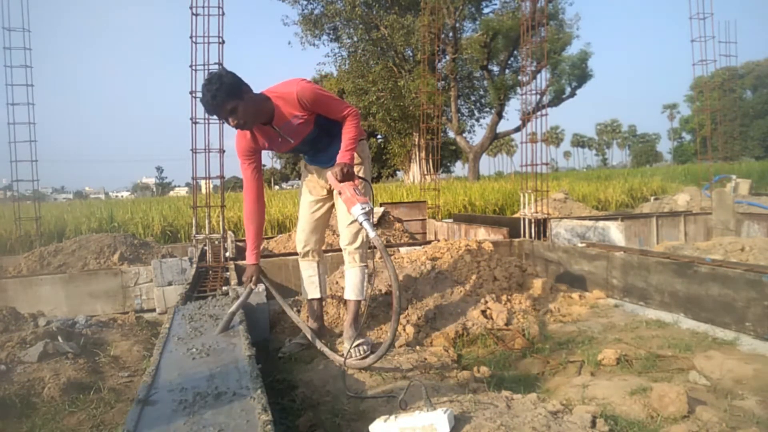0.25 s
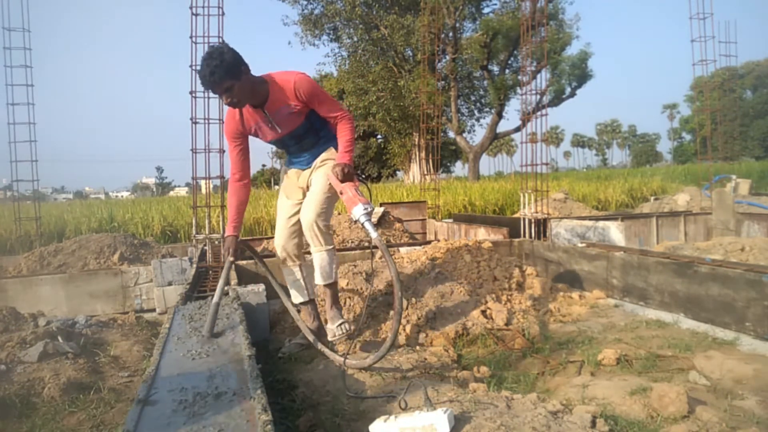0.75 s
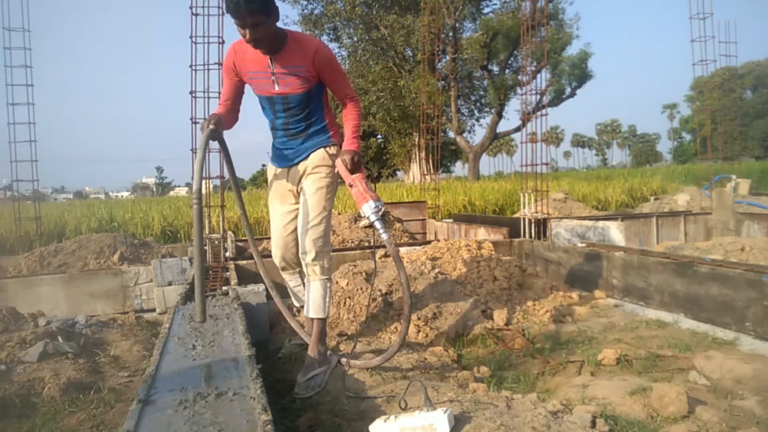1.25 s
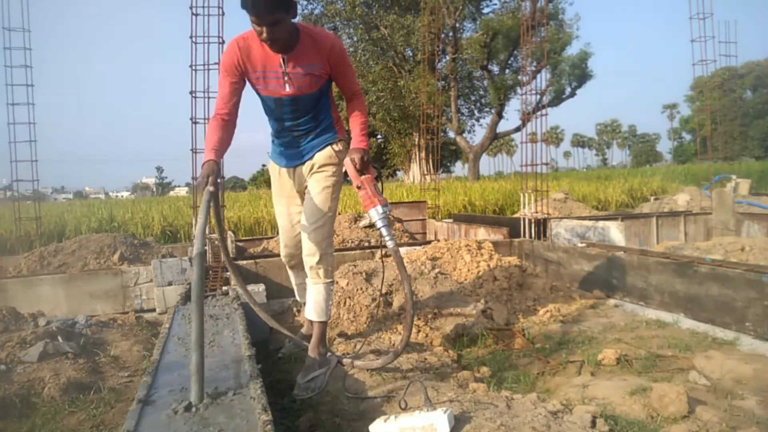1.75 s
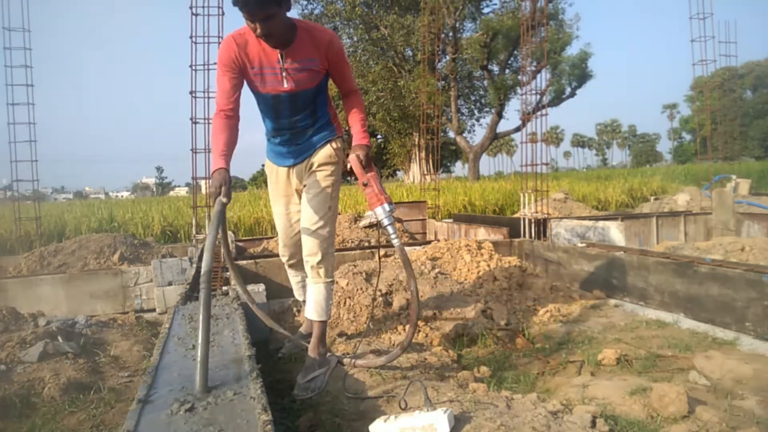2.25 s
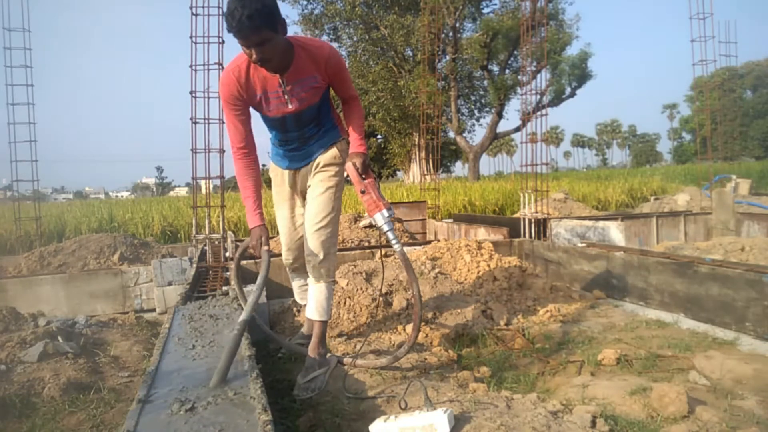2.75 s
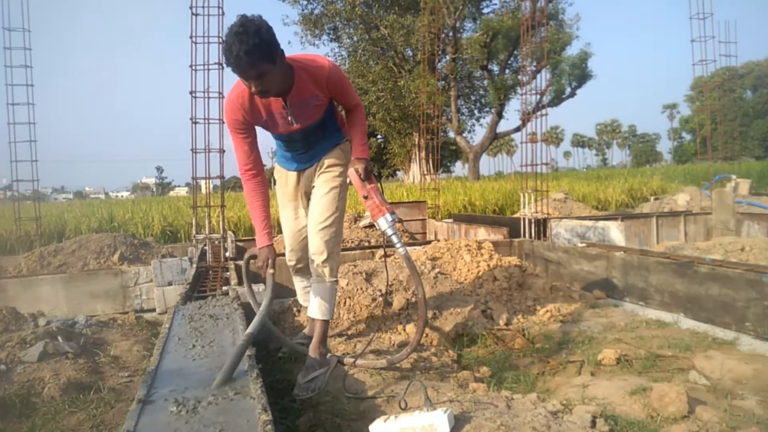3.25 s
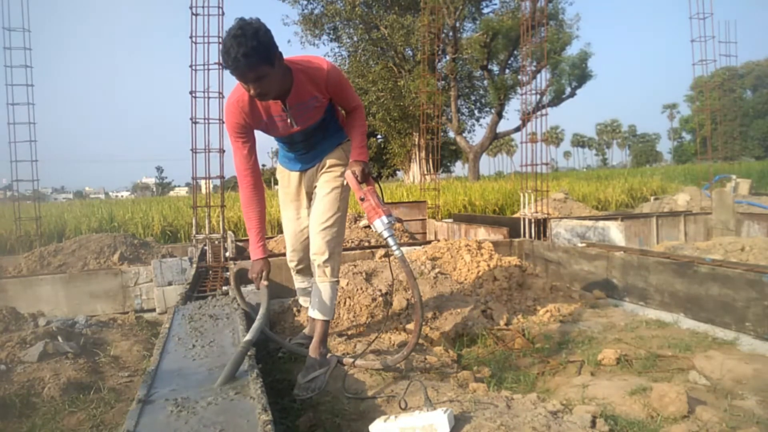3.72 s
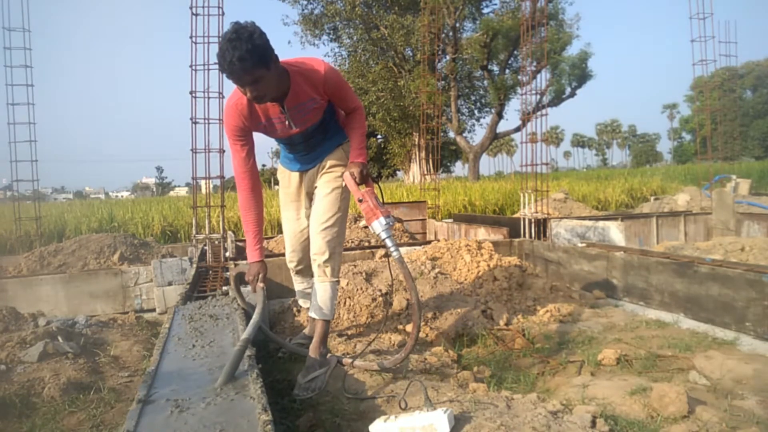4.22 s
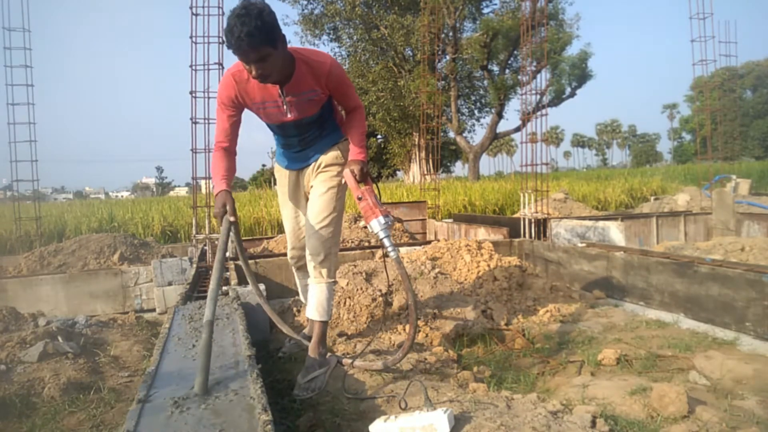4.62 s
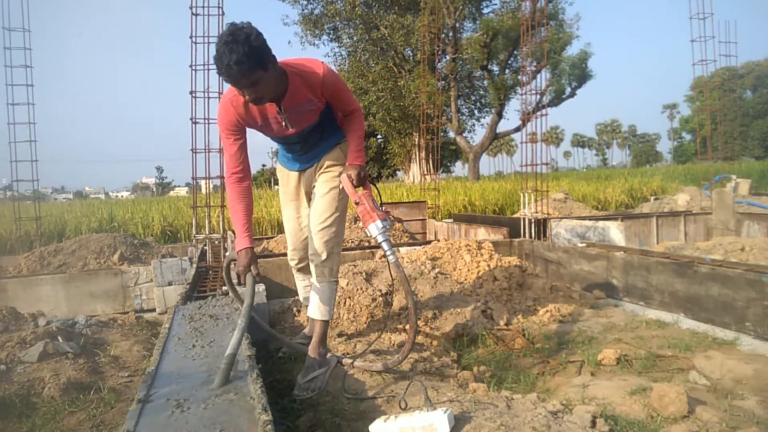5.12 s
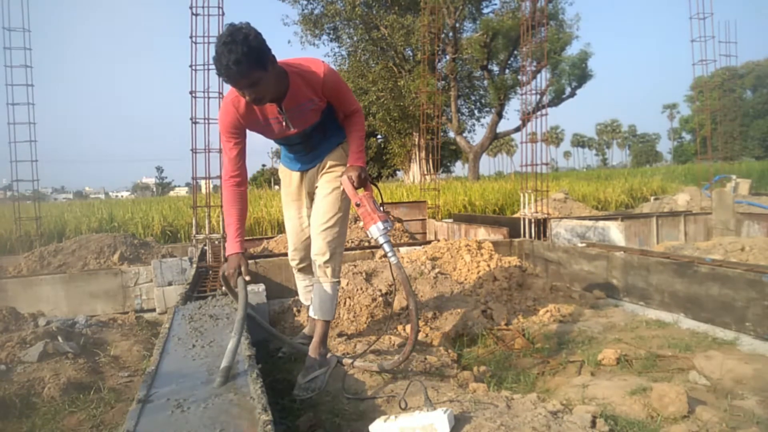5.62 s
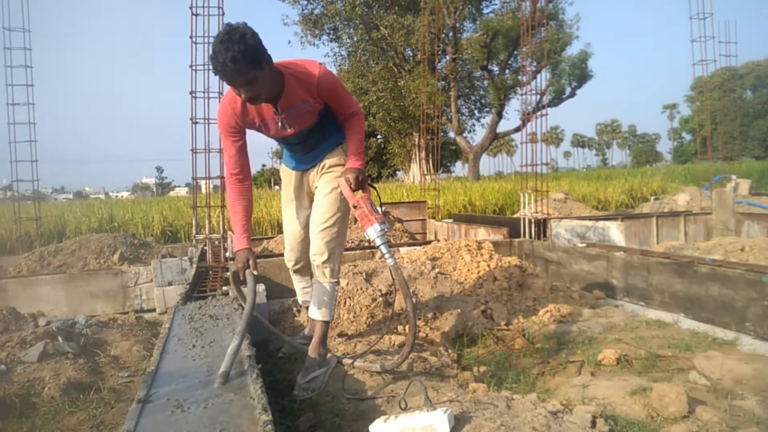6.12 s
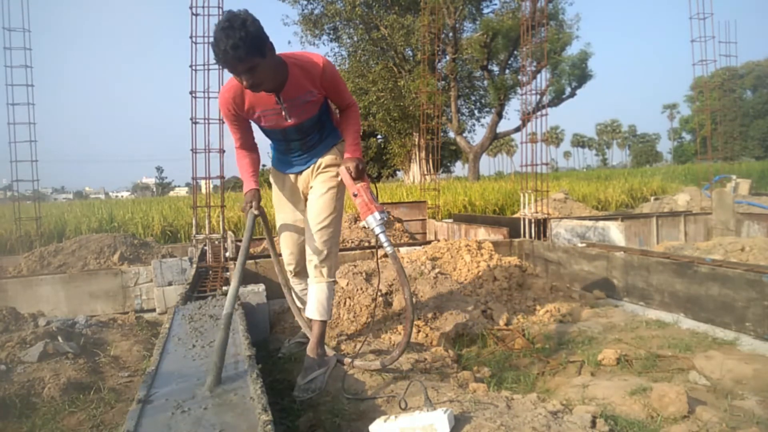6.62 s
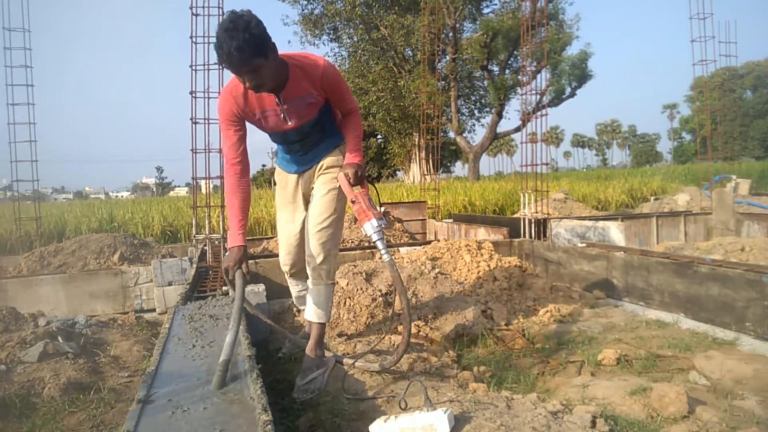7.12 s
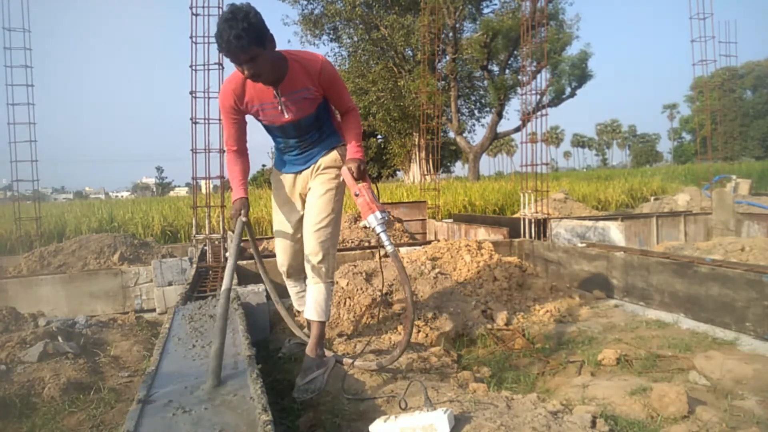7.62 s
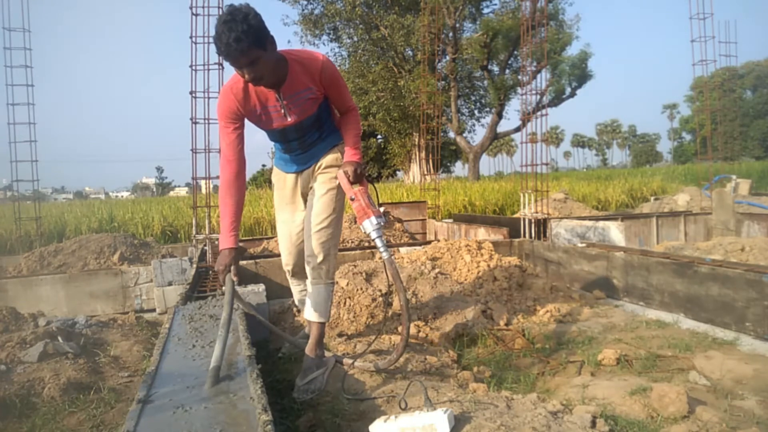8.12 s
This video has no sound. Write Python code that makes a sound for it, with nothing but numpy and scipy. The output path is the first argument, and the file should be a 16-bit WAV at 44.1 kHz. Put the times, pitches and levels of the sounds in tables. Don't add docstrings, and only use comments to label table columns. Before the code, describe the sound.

A handheld electric motor whines continuously, high and piercing, over fan hiss on an open building site. Bumps and rattling boards open; around 1.3 seconds the poker lifts, the pitch rises and stones tick off it. From 2.6 seconds it sinks back with heavy wooden thuds, then gritty churning and small wet pops. A phone a few metres away gives thin, flickering treble.

```python
import sys
import numpy as np
from scipy import signal
from scipy.fft import rfft, irfft, next_fast_len
from scipy.io import wavfile
from scipy.ndimage import uniform_filter1d

SR = 44100
rng = np.random.default_rng(int(sys.argv[2]) if len(sys.argv) > 2 else 0)


def volts_from_decibels(level):
    exponent = np.asarray(level, float) / 20
    return 10 ** exponent


def generate_wav(sig):
    pcm = np.round(np.clip(np.atleast_2d(sig).T, -1, 1) * 32767).astype(np.int16)
    wavfile.write(sys.argv[1], SR, pcm)


N = 369116
T = np.arange(N) / SR
FAST = next_fast_len(N)
HZ = np.arange(FAST // 2 + 1) * SR / FAST
WIN = dict(fs=SR, nperseg=512, noverlap=384)
LEFT_RIGHT = np.array([[1], [-1]])


def columns(table):
    s, *cols = np.transpose(table)
    return [np.interp(T, s, c) for c in cols]


def on_log(hz, table):
    points = np.array(table)
    return np.interp(np.log(hz + 1), np.log(points[:, 0]), points[:, 1])


def unit(x):
    return x / np.sqrt(np.mean(x ** 2))


def walk(rate, count=1):
    k = int(SR / rate)
    held = np.repeat(rng.standard_normal((count, N // k + 1)), k, axis=1)[:, :N]
    return unit(uniform_filter1d(held, k, axis=1))


def shape(x, table, lo_hz, hi_hz):
    spec = rfft(x, FAST) * volts_from_decibels(on_log(HZ, table))
    inside = spec[..., (HZ > lo_hz) & (HZ < hi_hz)]
    return irfft(spec, FAST)[..., :N] / np.sqrt(2 * np.sum(abs(inside) ** 2) / x.size / FAST)


def ring(x, modes):
    out = 0
    for hz, width_hz, db in modes:
        out = out + volts_from_decibels(db) * signal.lfilter(*signal.iirpeak(hz, hz / width_hz, SR), x)
    return out


def swells(events, rest_db, count=1):
    attack_s, release_s, swell = 0.025, 0.032, 0.34
    power = volts_from_decibels(rest_db) ** 2
    for start, length, *db in events:
        rise = (T - start) / (attack_s + swell * length) + .5
        fall = (start + length - T) / (release_s + swell * length) + 0.73
        gate = np.clip(np.minimum(rise, fall), 0, 1)
        power = power + (gate * volts_from_decibels(sum(db[:count]))) ** 2
    return 10 * np.log10(power)


def window(s, start, length, fade_s):
    return np.clip(np.minimum(s - start, start + length - s) / fade_s + .5, 0, 1)


def bumps(events, t60_s, rise_s=0.0032):
    out, t = np.zeros(N + 9000), np.arange(9000) / SR
    for start, db, hz in events:
        modes = sum(np.sin(2 * np.pi * (hz * ratio * t)) for ratio in (.8, 1, 1.27))
        envelope = (1 - np.exp(-t / rise_s)) * 1000 ** (-t / t60_s)
        out[int(start * SR):][:9000] += volts_from_decibels(db - 4.5) * modes * envelope
    return out[:N]


# frequency_hz, left_minus_right_db
PORT_BALANCE = [(60, 0), (200, -0.5), (700, .5), (2400, -0.5), (4400, -1), (6500, -2.5), (8100, -8.5),
                (10500, -16), (12500, -1.5), (15000, -5)]
# frequency_hz, shared_power_0_to_1
PORT_LIKENESS = [(40, .9), (70, .96), (130, .94), (290, .66), (640, .84), (1400, .62), (3100, .58),
                 (6800, .25), (15000, .5)]


def ports(direct, lag_s):
    share = np.clip(on_log(HZ, PORT_LIKENESS), 0, 1)
    first, left, right = rfft(direct, FAST)
    shared = np.sqrt(share) * first * np.exp(1j * np.pi * HZ * lag_s * LEFT_RIGHT)
    both = shared + np.sqrt(1 - share) * np.array([left, right])
    return irfft(both * volts_from_decibels(LEFT_RIGHT * on_log(HZ, PORT_BALANCE) / 2), FAST)[:, :N]


# time_s, gear_mesh_hz
SPEED = [(0, 2758), (.65, 2852), (1.24, 2940), (1.55, 3093), (1.8, 3094), (2.17, 3099), (2.63, 2972),
         (2.98, 2921), (3.24, 2758), (3.54, 2815), (4.59, 2876), (4.75, 2797), (5.11, 2814), (6.05, 2974),
         (6.65, 2898), (7.08, 2900), (7.41, 2990), (8.37, 2998)]


def motor_speed():
    return columns(SPEED)[0]


# start_s, length_s, gain_db
LIFTS = [
    (1.3, 0.89, 11.5),
]


def free_running():
    return swells(LIFTS, 0)


# multiple_of_mesh, wander_hz, left_db, right_db
WHINE = [(1, 95, -4.5, -2.5), (1.34, 79.8, -11.5, -7.5), (1.6, 30.1, -15.5, -13), (2, 21.1, -2.5, -1),
         (2.2, 40, -17, -11.5), (2.36, 40, -21, -12), (2.6, 35, -12, -10.5), (3, 23.2, -6, 1),
         (3.056, 26.8, -25, -6), (3.331, 30.2, -14, -8), (3.598, 31.8, -5, -2), (3.929, 41, -13, 2),
         (4, 33.2, -9, 9), (4.6, 70, -16, -9), (5, 35, -17, -6)]
# time_s, third_tone_db, second_tone_left_minus_right_db
FACING = [
    (0, 0, 5),
    (1.2, 0, -7),
    (2.4, -2, -0.5),
    (3.3, -10, -1),
    (5.3, 2.5, -3),
    (6.3, -1, -4.5),
    (7.3, 1, 2),
    (8.37, 0, 13),
]


def whine(mesh_hz, body_db, low_db, high_db, free_db):
    third_db, turn_db = columns(FACING)
    hunt = .0006
    turns = np.cumsum(mesh_hz * (1 + hunt * walk(18)[0])) / SR
    skew = LEFT_RIGHT * (-.015 + .02 * walk(1.5))
    out = 0
    for multiple, wander_hz, left_db, right_db in WHINE:
        casing = multiple < 1.5
        wobble = np.cumsum(walk(260 if casing else 80)[0]) * wander_hz / SR
        tone = np.sin(2 * np.pi * (multiple * turns + wobble + rng.random() + multiple * skew))
        level_db = np.array([[left_db], [right_db]]) + 1.2 * walk(12, count=2) + 1.8 * walk(70)
        if casing:
            level_db = level_db + body_db + 3 * walk(400)
        elif multiple <= 1.5:
            level_db = level_db + body_db
        elif multiple <= 2.5:
            level_db = level_db + low_db
        else:
            level_db = level_db + high_db
        if multiple > 4.9:
            level_db = level_db + .6 * free_db
        if round(multiple, 1) == 3:
            level_db = level_db + third_db
        if round(multiple, 1) == 2:
            level_db = level_db + .5 * LEFT_RIGHT * turn_db
        out = out + tone * volts_from_decibels(level_db)
    return out


# frequency_hz, width_hz, level_db
HOUSING = [(8070, 350, 0), (8890, 290, -2), (9447, 130, 4.5), (10350, 200, -3)]
# frequency_hz, density_db_per_hz
HISS = [(2000, -20.5), (2500, -3), (2850, 2), (3400, -1.5), (4000, -1.5), (5200, -2), (5900, -1),
        (6900, -3), (8000, -4), (9100, -3.5), (10000, -1), (11300, 2), (12600, -3.5), (15500, -1)]
# multiple_of_mesh, width_in_multiples,
# left_db, right_db
FAN_DIPS = [(3.11, 0.11, -2, 0.5), (3.8, 0.059, 2, -6.5), (4.17, 0.08, -13, -2.5), (4.4, 0.064, 3, 4)]


def hiss(mesh_hz, hiss_db, free_db, air_db):
    noise = rng.standard_normal((3, N)) * volts_from_decibels(0.82 * walk(45))
    noise = ports(shape(noise + ring(noise, HOUSING), HISS, 9540, 11840), lag_s=0)
    hz, s, spec = signal.stft(noise, **WIN)
    at = np.minimum((s * SR).astype(int), N - 1)
    mesh, free = mesh_hz[at], free_db[at]

    def bell(multiple, width):
        return np.exp(-((hz[:, None] / mesh - multiple) / width) ** 2)

    low = 1 / (1 + (hz[:, None] / 5500) ** 24)
    top = 1 / (1 + (4.37 * mesh / (hz[:, None] + 1)) ** 60)
    arch = bell(4.7, 0.13) * 0.66
    dips_db = sum(np.array(db)[:, None, None] * bell(multiple, width) for multiple, width, *db in FAN_DIPS)
    fall_db = np.array([-3.5, -7.5])[:, None, None]
    tilt_db = (low * 0.38 + top * 0.21 + arch) * free + top * (fall_db + air_db[at]) + dips_db
    opposed_band = np.exp(-((hz - 4520) / 360) ** 4)
    opposed_share = (.35 + .072 * free) * (1 - abs(.2 * walk(12)[0][at]))
    opposed = np.clip(np.outer(opposed_band, opposed_share), 0, 1)
    spec[1] = np.sqrt(1 - opposed ** 2) * spec[1] - opposed * spec[0]
    flicker = walk(14, count=17)[:, at][(hz // 1400).astype(int)]
    return signal.istft(spec * volts_from_decibels(tilt_db + 0.75 * flicker), **WIN)[1][:, :N] * volts_from_decibels(hiss_db)


# time_s, motor_db, gearbox_toward_phone_db, fan_toward_phone_db, casing_hum_db, cooling_air_db
GRIP = [(0, -45.5, -7, 7.5, 9, -4), (.8, -46.5, -1.5, 1.5, 2.5, -1), (1.2, -45, 0, 4, 6.5, -2),
        (1.35, -46.5, 1.5, 7, -5, -1), (2.2, -45.5, 7.5, 1, 4.5, 1), (2.45, -46.5, 7.5, 9.5, 3, 2),
        (2.95, -45, 8, 4.5, 4, -1), (3.25, -46, 1.5, 9, 1.5, 0), (3.6, -44.5, 4.5, 2, 1.5, -0.5),
        (4.5, -45.5, 0, 1.5, 1, 0.5), (5.0, -46, -3.5, 7.5, 6.5, 1), (5.45, -47, 4, 4, 1.5, 2),
        (6.1, -44.5, 6.5, 2, -5, 2), (6.35, -46, 7, 6, -2, 1), (6.9, -45, 3.5, 3, 2, 2),
        (7.1, -45, -7, 5, -4, 2), (7.45, -47, 5, -5, 6.5, 2), (8.37, -45.5, 0.5, 2, 7, 3)]


def motor(mesh_hz):
    hiss_db, gear_db, fan_db, body_db, air_db = columns(GRIP)
    free_db = free_running()
    tones = whine(mesh_hz, body_db - 53.5, gear_db - 52.5, fan_db - 56.5, free_db)
    return hiss(mesh_hz, hiss_db, free_db, air_db) + tones


# frequency_hz, width_hz, level_db
FORMWORK = [(119, 83, -4), (255, 83, 0), (310.5, 50, -3), (380, 152, -5), (514, 240, -8)]
# start_s, length_s, ring_db, knock_re_ring_db
TOUCHES = [(0, 0.24, -56.5, 0.5), (1.77, 0.095, -51.5, -2), (2.6, 0.7, -54.5, -1), (2.75, 0.028, -50, 2),
           (2.93, 0.16, -42, -3), (3.07, 0.13, -36, -4), (3.24, .11, -41, -11), (3.4, 0.19, -41.5, -12),
           (3.58, 0.2, -53, 4.5), (3.8, 0.23, -44.5, -9.5), (4.57, 0.098, -44.5, -7.5),
           (5.95, 0.18, -55.5, -11), (6.11, 0.13, -50.5, 0.5), (8.3, 0.094, -47.5, -9)]


def boards(mesh_hz):
    ring_db = swells(TOUCHES, -64)
    knock_db = swells(TOUCHES, -65, count=2)
    spin_hz = .0435 * mesh_hz * (1 + .02 * walk(30)[0])
    turn = np.cumsum(spin_hz) / SR
    blows = unit(np.diff(np.floor(turn), prepend=0) * volts_from_decibels(1.8 * rng.standard_normal(N)))
    rattle = rng.standard_normal((3, N)) * volts_from_decibels(1.9 * walk(50))

    def twice(x, modes):
        return unit(ring(ring(x, modes), modes))

    ringing = twice(blows + 2.0 * rattle, FORMWORK[1:2]) * volts_from_decibels(ring_db)
    knock = twice(.5 * blows + rattle, FORMWORK[2:]) * volts_from_decibels(knock_db)
    hum = twice(blows, FORMWORK[:1]) * volts_from_decibels(ring_db - 37)
    return ringing + knock + hum


# frequency_hz, density_db_per_hz
SLURRY = [(500, -10.5), (700, -4), (1050, 1), (1600, -1), (2100, -22.5)]
# frequency_hz, density_db_per_hz
RASP = [(1400, -46), (1800, 0.5), (2100, 4), (2500, 1), (2900, -18)]
# start_s, length_s, slurry_db, rasp_re_slurry_db
CHURNS = [(0, 0.16, -55, -4), (1.3, 0.22, -69, 18.5), (1.6, 0.17, -62, 11), (1.76, 0.058, -52.5, 12.5),
          (1.83, 0.057, -46, -6), (2.55, 0.024, -49, -8), (2.62, 0.57, -63.5, 14.5), (2.99, 0.018, -52, -2),
          (3.5, 0.26, -49, -1.5), (3.71, 0.059, -48, -9), (3.78, 0.07, -50, -1), (3.88, 0.19, -47.5, 0.5),
          (4.1, 0.56, -59.5, 2), (4.6, 0.06, -50, 1), (4.7, 0.015, -48, -10), (6.5, 0.24, -73, 23),
          (6.75, 0.32, -59, 8), (7.25, 0.026, -56, -12), (7.45, 0.21, -54.5, 5), (7.65, 0.086, -66, 15),
          (7.88, 0.14, -66.5, 11)]


def churn():
    grains = rng.standard_normal((3, N)) * volts_from_decibels(1.55 * walk(70))
    slurry = shape(grains, SLURRY, 830, 1790) * volts_from_decibels(swells(CHURNS, -56))
    rasp = shape(grains, RASP, 1400, 2900) * volts_from_decibels(swells(CHURNS, -57, count=2))
    return slurry + rasp


# frequency_hz, density_db_per_hz
RUMBLE = [(50, -16.5), (95, -13.5), (130, 0.5), (158, -2.5), (185, -12), (300, -23), (600, -63)]
# frequency_hz, density_db_per_hz
SITE = [(12, -52), (20, -7), (133, 1.5), (151, -2.5), (330, -26.5), (393, -17), (468, -30), (644, -18.5),
        (900, -20), (1170, -64), (1980, -120)]
# start_s, length_s, level_db
THUMPS = [(1.62, 0.073, -47), (1.94, 0.0093, -35), (2.09, 0.02, -43), (2.61, 0.076, -39.5),
          (2.74, 0.034, -34), (2.83, 0.11, -36), (2.95, 0.083, -34), (3.17, 0.034, -37), (3.25, 0.42, -46),
          (3.8, 0.034, -34), (3.88, 0.055, -38), (3.98, 0.12, -47.5), (4.2, 0.07, -40), (4.62, 0.059, -45),
          (4.75, 0.069, -40.5), (6.2, 0.071, -50), (7.19, 0.052, -39.5), (7.5, 0.15, -48),
          (7.82, 0.029, -36.5), (7.91, 0.073, -37.5)]


def rumble():
    throb_hz, throb_db = 12.1, 3.0
    throb = throb_db * np.cos(2 * np.pi * throb_hz * T) + 1.2 * walk(25)
    thump = shape(rng.standard_normal((3, N)) * volts_from_decibels(throb), RUMBLE, 59, 248)
    murk = shape(rng.standard_normal((3, N)) * volts_from_decibels(throb), SITE, 15, 100.3)
    return thump * volts_from_decibels(swells(THUMPS, -49) - 3.0) + murk * volts_from_decibels(-53.5)


# start_s, peak_db, pitch_hz
BUMPS = [(.022, -36, 610), (.071, -37.5, 644), (.111, -37, 633), (.135, -40, 607), (.189, -36, 490),
         (.207, -38.5, 664), (.587, -30, 413), (2.21, -42, 451), (1.745, -35, 755), (1.785, -33, 833),
         (1.83, -45, 876), (2.761, -29, 316), (2.953, -32, 244), (2.997, -38, 170), (3.027, -19, 158),
         (3.08, -25, 244), (3.12, -33, 233), (3.148, -32, 239.5), (3.175, -20, 294), (3.18, -33, 496),
         (3.195, -21.5, 211), (3.728, -36, 618.2), (4.625, -29, 293), (6.179, -36, 282)]


def boot_bumps():
    return bumps(BUMPS, t60_s=0.086)


# start_s, peak_db, pitch_hz
PLOPS = [(.5, -39.5, 1056), (1.735, -24, 3220), (1.845, -34, 1480), (1.68, -41, 1100), (1.865, -42, 1480),
         (3.0, -52, 1100), (3.735, -25, 990), (4.696, -28.5, 1304), (4.697, -45, 870), (4.712, -37, 1250),
         (6.36, -41, 1040), (6.71, -44, 1107), (7.01, -47, 1093), (7.09, -45, 1050), (7.26, -42, 1137),
         (7.42, -38, 960), (7.52, -51, 1094), (7.62, -56, 1086), (8.19, -44, 900)]


def plops():
    return bumps(PLOPS, t60_s=0.065)


# start_s, peak_db, pitch_hz
TICKS = [(1.3543, -34, 2400), (1.6731, -35, 2400), (1.7666, -17, 2360), (1.7764, -30, 2330),
         (1.785, -24, 2180), (1.7984, -22, 2630), (1.8174, -27, 2020), (1.838, -22, 2470),
         (1.8624, -26, 1610), (2.7192, -32, 2000), (1.2767, -27, 2460), (1.3869, -24, 2400),
         (1.4433, -32, 3000), (1.4662, -31, 3060), (2.6533, -24, 3020), (2.9316, -38.5, 1958),
         (2.9616, -40, 1970), (3.0025, -39, 1930), (3.624, -26, 2040), (3.652, -35, 1080),
         (3.685, -22, 1400), (3.805, -30, 1060), (3.843, -35, 1150), (3.8876, -27, 1880),
         (3.937, -26, 1560), (3.969, -31, 1280), (3.987, -35, 1454), (4.042, -31, 1820),
         (6.6079, -28, 2710), (6.759, -23, 3120), (7.513, -35, 1980)]


def stone_ticks():
    return volts_from_decibels(-1) * bumps(TICKS, t60_s=0.011, rise_s=0.00037)


# start_s, peak_db, pitch_hz
THUDS = [(2.618, -24.5, 152), (2.66, -38, 124), (2.76, -28, 160), (2.844, -21, 128), (2.862, -21, 140),
         (2.882, -27, 140), (2.927, -28, 129), (3.398, -29.5, 258), (3.805, -38, 129.6), (3.887, -30, 120),
         (3.91, -35, 200), (4.423, -31, 140), (4.535, -39, 140.2), (4.578, -35, 233), (4.6, -35, 249.8),
         (4.635, -31, 119), (4.66, -40, 240), (4.797, -32, 102), (4.83, -28, 150.6), (4.881, -24.5, 118)]


def thuds():
    return bumps(THUDS, t60_s=0.13, rise_s=0.0073)


def scene():
    mesh_hz = motor_speed()
    hits = boot_bumps() + plops() + stone_ticks() + thuds()
    echoed = np.array([hits, np.roll(hits, 60), np.roll(hits, 150)])
    return motor(mesh_hz) + ports(echoed + boards(mesh_hz) + churn() + rumble(), lag_s=0.000089)


# start_s, length_s, centre_hz, left_db, right_db
SHADOWS = [(0, 1.4, 8950, -8, -1), (0, 1.2, 6850, -6, -2), (0, 1.25, 5350, -5, -4),
           (.1, 1.4, 12900, -2, -5), (0, 1.2, 14500, -3, -2), (.2, 1, 3850, 3, 0), (1.25, .5, 2500, 3, 2),
           (1.4, .6, 4000, 4, 0), (1.5, 1.2, 11200, -5, 0), (2.3, .7, 12900, -3, -5),
           (3, 2.7, 12000, -10, 0), (3, 1.9, 5300, -6, -6), (3.5, 1.7, 4350, -4, -4),
           (3.75, .5, 2450, -4, -4), (6.9, 1.4, 5250, -2, -2), (3.05, 2.35, 8750, -10, 0),
           (3.2, 2.2, 12900, 2, 5), (3.3, .8, 7900, -6, 0), (4, 1.3, 7000, 0, -4), (4.8, 1.9, 6800, -7, -1),
           (4.8, .8, 7750, -6, 0), (5.8, .5, 9800, -8, 0), (6.3, 1, 12200, -5, 2), (6.3, 2, 10900, -5, 0)]


def shadows_db(hz, s):
    gain_db = np.zeros((2, len(hz), len(s)))
    for start, length, centre_hz, *db in SHADOWS:
        band = np.exp(-((hz - centre_hz) / 220) ** 2)
        gain_db += np.array(db)[:, None, None] * np.outer(band, window(s, start, length, .12))
    return gain_db


# frequency_hz, threshold_db
FAINT_LIMIT = [(1500, -20), (2600, -6.5), (3600, -4.5), (4600, -1), (5400, -2), (7000, -2.5), (8500, -7),
               (11000, -7), (12400, -5), (13500, -1), (15500, -1)]


def thin_out(x):
    frame, dip_at = 1024, 790
    treble = irfft(rfft(x, FAST) / (1 + (6500 / (HZ + 1)) ** 4), FAST)[:, :N]
    place = np.arange(N) % frame - dip_at
    flutter_db = -1.1 * np.cos(8 * np.pi * place / frame) - 10.5 * np.exp(-(place / 55) ** 2)
    long = dict(fs=SR, window="cosine", nperseg=2 * frame, noverlap=frame)
    hz, s, spec = signal.stft(x + treble * (volts_from_decibels(flutter_db) - 1), **long)
    spec = spec * volts_from_decibels(shadows_db(hz, s))
    bands = (abs(spec[:, :frame]) ** 2).reshape(2, frame // 8, 8, -1).mean(axis=2)
    near = uniform_filter1d(uniform_filter1d(bands, size=13, axis=1), size=3, axis=2)
    mask = near ** .6 * near.mean(axis=0) ** .4
    drift_db = 5 * uniform_filter1d(rng.standard_normal(bands.shape[1:]), size=2)
    heard = bands > mask * volts_from_decibels(on_log(hz[4:frame:8], FAINT_LIMIT)[:, None] + drift_db) ** 2
    spec[:, :frame] *= np.repeat(heard, 8, axis=1) * (hz[:frame, None] < 15480)
    return signal.istft(spec, **long)[1][:, :N]


# start_s, length_s, left_db, right_db
MIDDLE_SLIPS = [
    (.1, 0.18, 3, 7.5),
    (1.29, 0.094, 7, 6.5),
    (2.98, 0.27, 7, 5.5),
    (3.278, 0.16, 0, 7.5),
    (3.396, 0.66, 4, 5),
    (4.02, 0.35, 6, -3),
    (5.361, 0.307, -2, 10),
    (6.55, 0.3, 3, 8),
    (6.712, 0.31, 1.5, -6),
]
BOTTOM_SLIPS = [
    (1.33, 0.18, 8.5, 2.8),
    (1.56, 0.22, 8, 4.2),
    (2.05, 0.24, 3, 2.8),
    (5.38, 0.22, -2, 2.9),
]
HIGH_SLIPS = [
    (1.29, 0.086, 2, 12.5),
    (1.43, 0.1, 2, 6.5),
    (2.33, 0.12, 9, 2),
    (2.451, 0.6, 10.1, 11),
    (5.472, .7, 3.5, 14),
    (5.82, 0.33, 8, -3),
    (6.82, 0.1, 11.2, 0),
    (7.4, 0.58, 11.5, 0.5),
    (7.4, 0.91, 2, 4),
    (8.161, 0.14, 9.5, -1.5),
]


def slip(x):
    hz, s, spec = signal.stft(x, **WIN)
    gain_db = np.zeros(spec.shape)
    for lo_hz, hi_hz, slips in ((5320, 6230, BOTTOM_SLIPS), (6010, 7720, MIDDLE_SLIPS), (7710, 9430, HIGH_SLIPS)):
        band = np.clip(np.minimum(hz - lo_hz, hi_hz - hz) / 90 + .5, 0, 1)
        for start, length, *db in slips:
            gain_db += np.array(db)[:, None, None] * np.outer(band, window(s, start, length, 0.02))
    return signal.istft(spec * volts_from_decibels(gain_db), **WIN)[1][:, :N]


def top_cut(x):
    return signal.sosfilt(signal.butter(12, 16640, fs=SR, output="sos"), x)


def record(dry):
    mix = slip(thin_out(dry))
    return top_cut(mix)


dry = scene()
out = record(dry)
generate_wav(out)
```